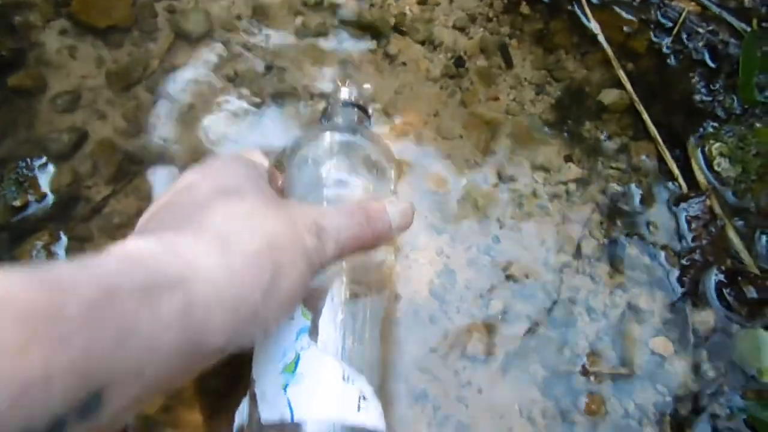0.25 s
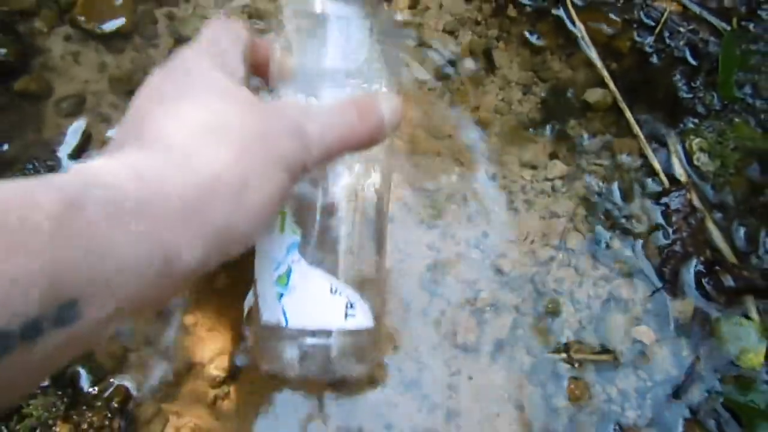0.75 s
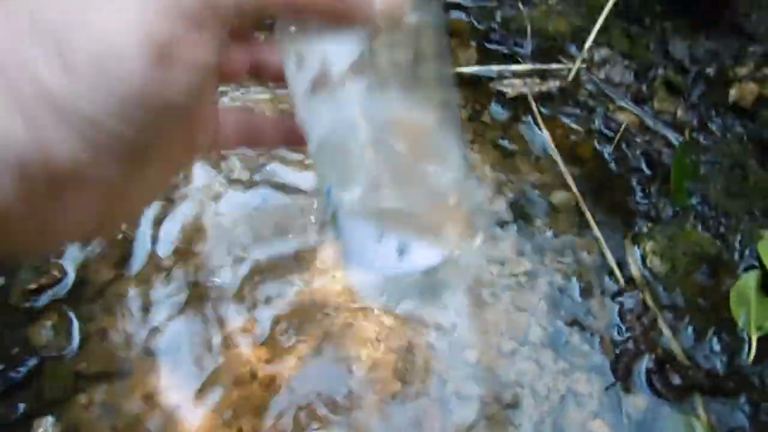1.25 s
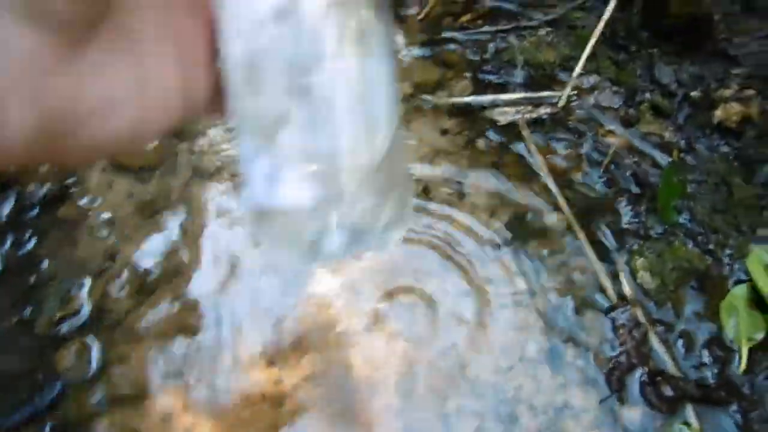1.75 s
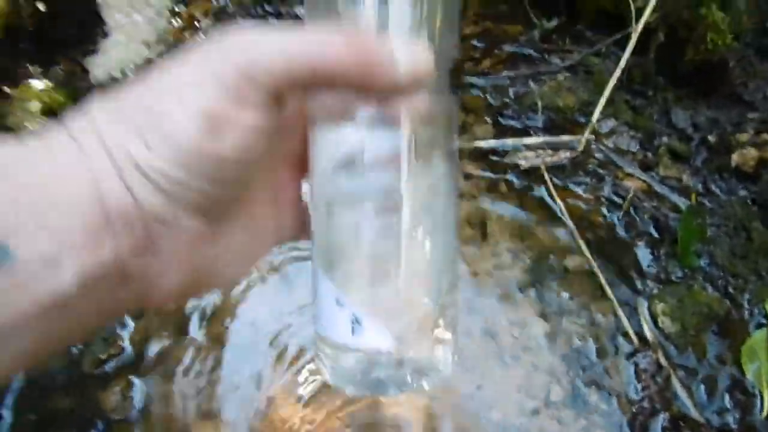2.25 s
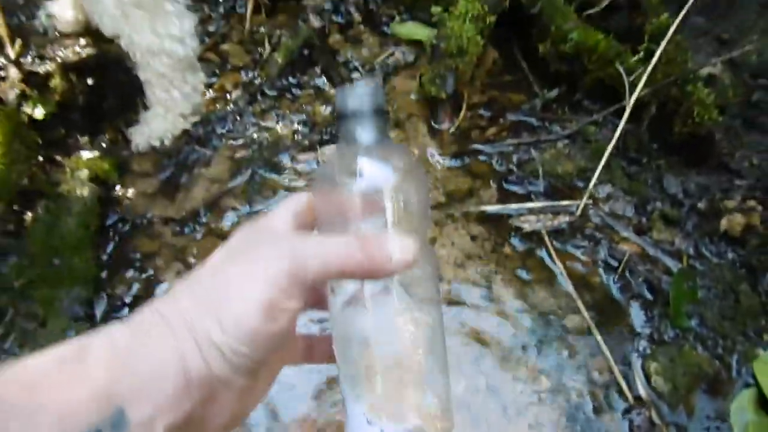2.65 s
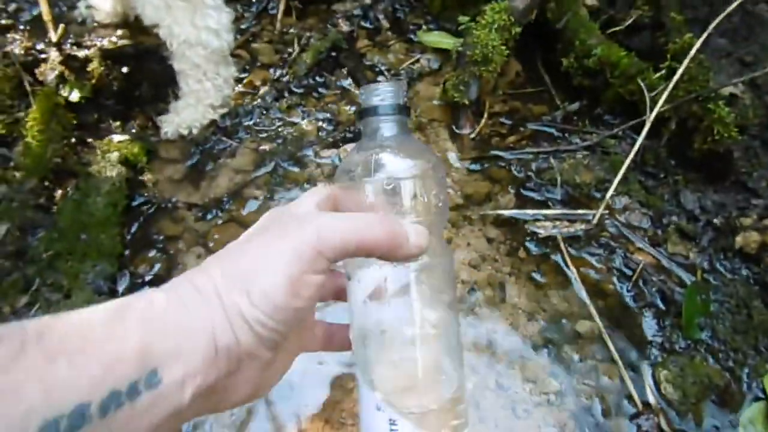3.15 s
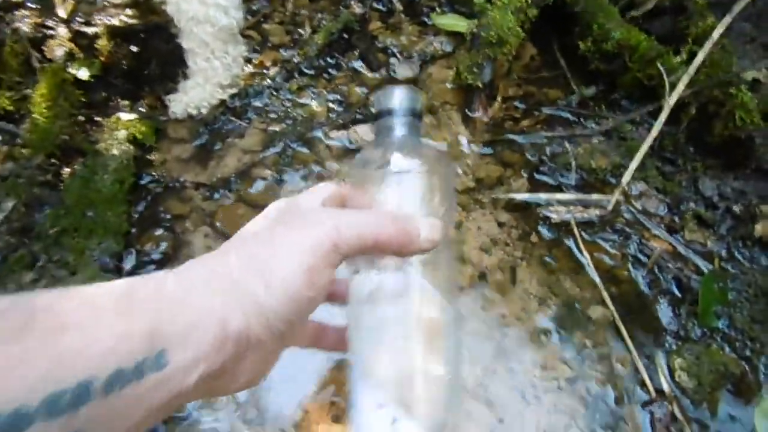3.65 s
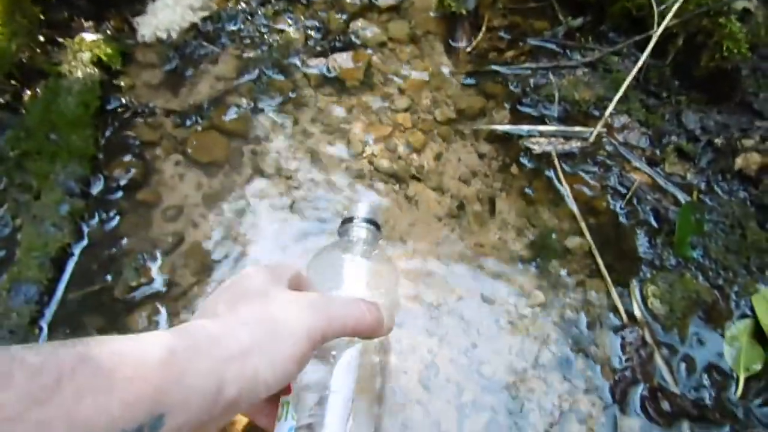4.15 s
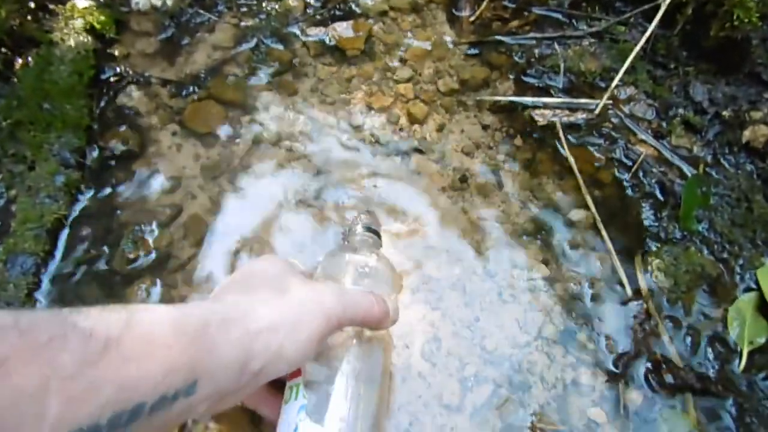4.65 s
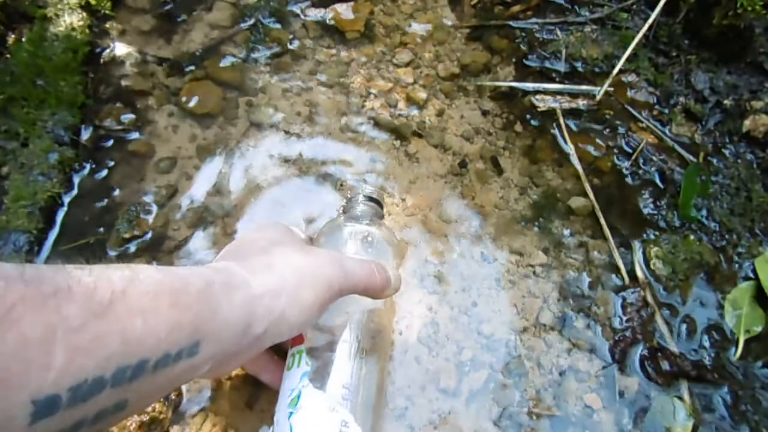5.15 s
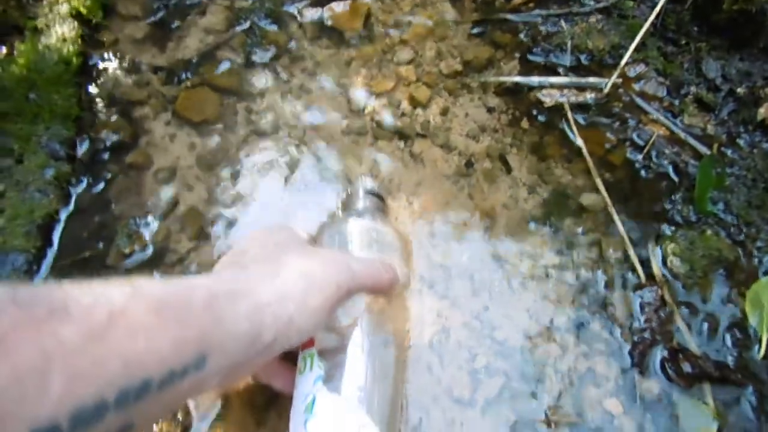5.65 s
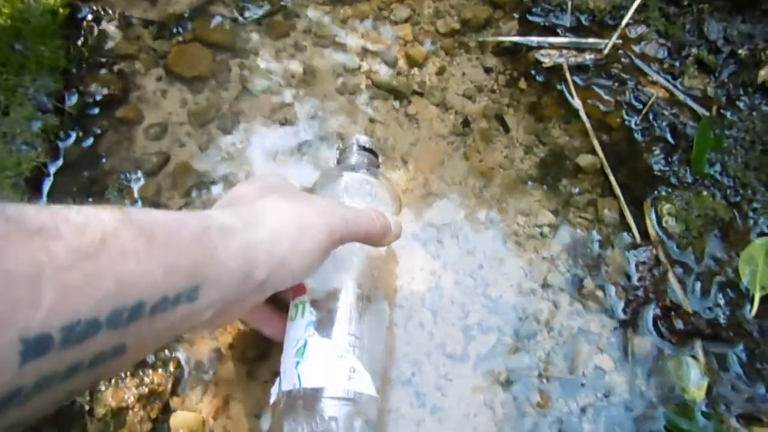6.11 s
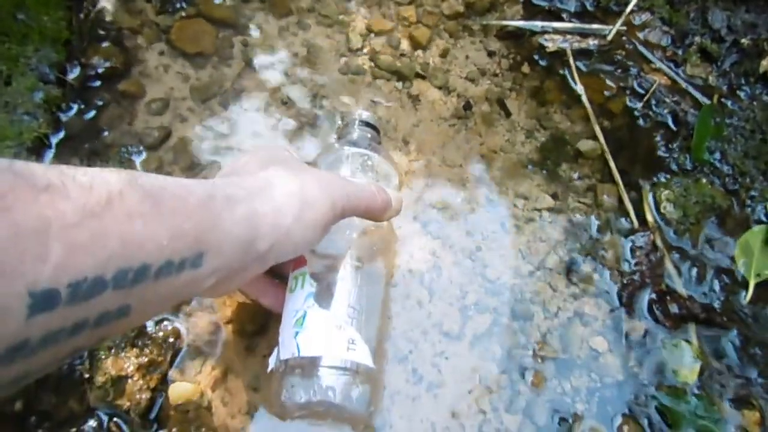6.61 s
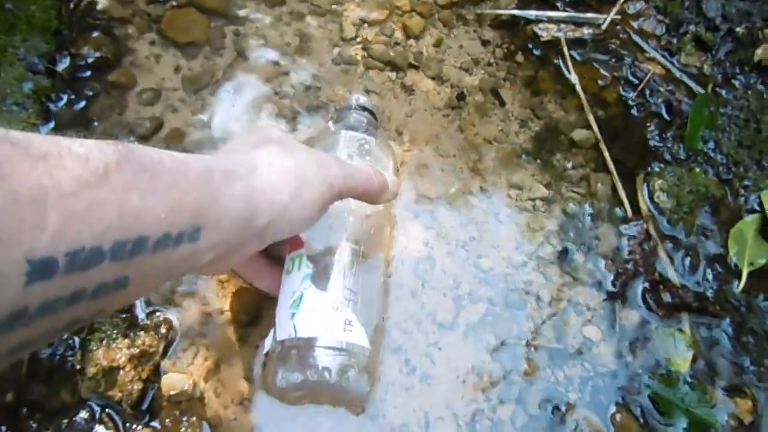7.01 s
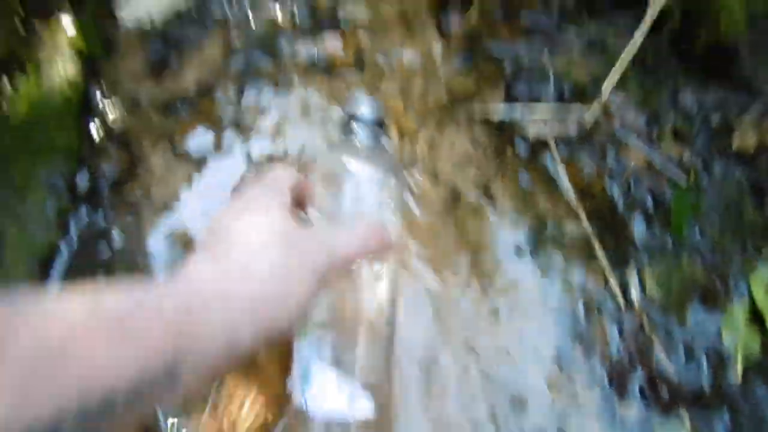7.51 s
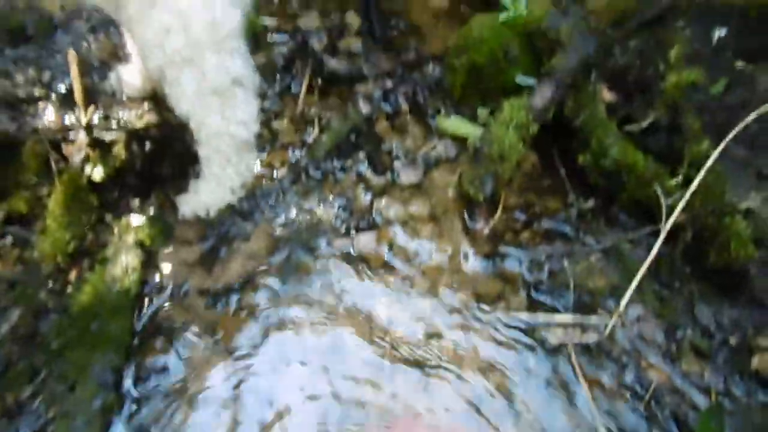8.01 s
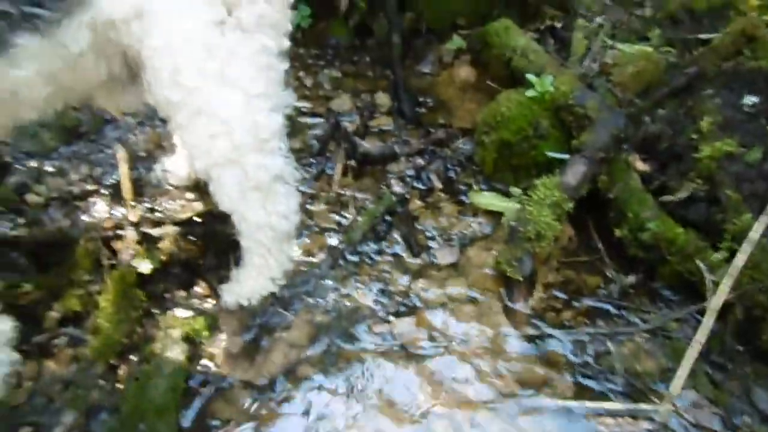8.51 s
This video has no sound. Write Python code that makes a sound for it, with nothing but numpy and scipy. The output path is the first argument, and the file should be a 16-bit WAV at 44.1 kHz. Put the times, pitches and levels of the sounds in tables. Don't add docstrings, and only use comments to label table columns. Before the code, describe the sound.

A soft, steady stream hiss lies under everything, in woodland with blurred echoes. From 0.1 to 0.85 s a plastic bottle is scraped over gravel close by: dense, sharp crackles, hollow clicks and gritty rubbing, loudest at 0.3-0.65 s, with low handling bumps. A tiny drip-like tick comes at 1 s. The bottle then nearly stops while a bird gives short whistles, quick chips and churrs around 1.9-2.5 s, a high whistle at 2.7 s and a rapid buzzing trill from 2.9 to 4 s; a lower bird answers faintly. Five sweet falling syllables run from 4.2 to 5.1 s over lighter, scattered scuffs and ticks. Thin whistles and a faint distant buzz follow until 6.9 s. Bottle scraping thickens from 6.8 to 7.6 s, with a knock at 7.5 s, then a short bubbly gulp at 7.7-7.8 s. Water hiss remains, with dull microphone thumps near 8.5 s and slightly fuller water at the end.

```python
import sys
import numpy as np
from scipy import signal
from scipy.io import wavfile
from scipy.ndimage import uniform_filter1d

SR = 44100
rng = np.random.default_rng(int(sys.argv[2]) if len(sys.argv) > 2 else 0)


def convert_level_to_amplitude(level_db):
    exponent = np.asarray(level_db, float) / 20
    return 10 ** exponent


def wav_out(sig):
    wavfile.write(sys.argv[1], SR, np.round(np.clip(np.atleast_2d(sig).T, -1, 1) * 32767).astype(np.int16))


N = 386757
REFILL_S = 3

# delay t/s, length t/s, first f/Hz, last f/Hz, level/dB, buzz depth f/Hz
BUZZY_FALL = [(0, .062, 5560, 4880, 2, 400)]


def evened(x):
    return x / np.sqrt(np.mean(x ** 2) + 1e-20)


def read(points, hz):
    f, value = np.transpose(points)
    return np.interp(np.log(hz + 1), np.log(f + 1), value)


def add(mix, s, sound):
    part = mix[round(s * SR):][:len(sound)]
    part += sound[:len(part)]


def band(x, lo_hz, hi_hz):
    return signal.sosfilt(signal.butter(2, [lo_hz, hi_hz], "bandpass", fs=SR, output="sos"), x)


def stream():
    # f/Hz, level/dB per Hz
    colour = [(12, -38.5), (20, 1), (146, -7.5), (300, -10), (3680, -14.5), (7450, -16), (8240, -29.5),
              (10700, -61)]
    # t/s, level/dB
    stir = [
        (0.0, -64.5),
        (0.539, -65.5),
        (1.05, -64),
        (6.722, -63.5),
        (7.3, -64),
        (8.77, -61),
    ]
    frames, hz = N // 256 + 5, np.fft.rfftfreq(1024, 1 / SR)
    real, imag, patches = rng.standard_normal((frames, 513, 3)).T
    patches = uniform_filter1d(patches, size=12, axis=0)
    patches_db = evened(uniform_filter1d(patches, size=12, axis=1))
    s, db = np.transpose(stir)
    swell_db = np.interp(np.arange(frames) * 256 / SR, s, db - np.median(db))
    swell_db = swell_db / (1 + (hz[:, None] / 1500) ** 2)
    spectrum = (real + 1j * imag) * convert_level_to_amplitude(read(colour, hz)[:, None] + patches_db + swell_db)
    hiss = signal.istft(spectrum, nperseg=1024, noverlap=768)[1][:N]
    return convert_level_to_amplitude(-57.5) * evened(hiss)


def ring(hz, width_hz, t):
    return np.exp(-np.pi * width_hz * t) * np.sin(2 * np.pi * hz * t)


def wall(modes):
    # f/Hz, level/dB
    grit_colour = [(250, -29.5), (550, -2.5), (1500, -8), (3800, -2), (7800, -14), (11000, -60.5)]
    t, hz = np.arange(1024) / SR, np.fft.rfftfreq(1024, 1 / SR)
    log_gain = np.log(convert_level_to_amplitude(np.maximum(read(grit_colour, hz), -60)))
    log_gain = np.r_[log_gain, log_gain[-2:0:-1]]
    tick = np.fft.ifft(np.exp(np.conj(signal.hilbert(log_gain)))).real
    plate = sum(convert_level_to_amplitude(db) * np.sqrt(width) * ring(f, width, t) for f, width, db in modes)
    return evened(tick) + 0.49 * evened(plate)


def grains(shape, per_s, spread_db):
    size_db = spread_db * np.minimum(rng.exponential(1, shape), 4)
    sizes = convert_level_to_amplitude(size_db) * rng.choice([-1., 1.], shape)
    return sizes * (rng.random(shape) < per_s / SR)


def scuff(length, db, hz, boom_db, snap_db, panel, body, grit, t):
    u = t / length - .55
    snap = 5.4 * (abs(t - .5 * length) < .5 / SR)
    swell = np.exp(-(np.where(u < 0, 3.5, 1.8) * u) ** 2)
    response = evened(body) + panel * evened(ring(hz, 140, t[:len(body)]))
    sound = signal.fftconvolve((grit + snap) * swell, response)
    parts = [band(sound, 430, 950), band(sound, 900, 4400), band(sound, 4400, 9000)]
    gains = convert_level_to_amplitude(db + np.array([boom_db, 0, snap_db])) * np.sqrt(length * SR)
    return sum(g * p / np.linalg.norm(p) for p, g in zip(parts, gains))


def cracks(empty, filled):
    # t/s, length t/s, rms level/dB, ring f/Hz
    full = [(.28, .013, -43, 2530), (.325, 0.011, -44, 2080), (.364, 0.017, -47.5, 3000),
            (.4432, 0.017, -46, 2200), (.455, 0.014, -46, 1200), (.5605, 0.004, -35.5, 2010),
            (.574, .005, -39.5, 600), (.808, 0.0079, -48, 1770), (4.351, 0.014, -53, 2000),
            (4.682, .016, -51, 760), (4.874, 0.014, -49.5, 2960), (4.916, 0.023, -53, 3000),
            (6.352, 0.022, -54.5, 2030), (6.9796, 0.0093, -50, 2150), (7.047, .02, -53.5, 1000),
            (7.2907, .024, -45, 2010), (7.49, .015, -38.5, 700), (7.478, 0.015, -58, 3120),
            (7.305, .015, -45.5, 3200), (7.492, .006, -38, 3200), (7.6825, .0084, -41.5, 885),
            (7.724, 0.0093, -53, 3420)]
    dull = [(.234, .022, -53.5, 680), (.5736, .0055, -51, 2050), (.5907, .022, -45, 1940),
            (.612, .008, -40, 500), (.6205, .004, -32, 2050), (.326, .012, -41.5, 3830),
            (.646, .006, -48, 3700), (7.432, .008, -49, 3050), (.633, .008, -39, 2700),
            (.744, .0099, -51, 1440), (1.896, .019, -53.5, 2260), (4.882, .023, -52, 3200),
            (6.301, .021, -55, 2120), (6.688, 0.0036, -46.5, 3730), (6.8297, .013, -45, 3310),
            (6.938, .004, -44, 3250), (7.028, .0056, -47.5, 3170), (7.2125, .0044, -46, 2020),
            (7.218, 0.0043, -40.5, 2120), (7.253, .019, -49, 2050), (7.31, .021, -47, 1190),
            (7.348, .016, -54.5, 1080), (7.403, .0078, -56, 3100), (7.462, .0039, -47, 3100),
            (7.544, .008, -38.5, 800)]
    crisp = [(.135, .023, -52, 2700), (.154, 0.024, -56, 2450), (.1913, 0.0087, -49, 1370),
             (.3071, 0.0084, -50, 2300), (.496, .017, -38, 2600), (.544, .006, -41, 2010),
             (.552, 0.002, -46, 1930), (.668, 0.011, -44, 2040), (.7185, 0.0058, -47, 1990),
             (.759, 0.004, -49, 1860), (.791, .022, -45.5, 3100), (4.214, 0.0054, -44.5, 2840),
             (4.279, 0.0097, -55, 1058), (4.7374, 0.0048, -49.5, 1700), (4.8494, 0.0087, -52, 1800),
             (4.857, .014, -49, 2410), (5.067, 0.005, -55, 1690), (5.079, 0.0039, -49.5, 760),
             (5.3886, 0.0041, -51.5, 1240), (5.5865, 0.0026, -39.5, 2160), (6.2255, 0.004, -48, 3220),
             (7.016, 0.016, -49.5, 2830), (7.421, 0.0083, -40.5, 2100), (7.532, 0.005, -46, 2300),
             (5.089, .004, -46.5, 4070), (5.317, .003, -57, 2250), (5.335, .003, -52, 1220),
             (5.609, .005, -53, 3900), (.097, .004, -52.5, 4500), (7.543, .008, -47, 1750),
             (7.74, .0073, -57, 3440), (7.7617, 0.004, -44.5, 2270), (7.8076, 0.0037, -53, 1160)]
    thin = [(.176, .009, -48, 2420), (.26, 0.0044, -50, 2520), (.312, .0021, -59, 2190),
            (.34, 0.004, -31, 2430), (.4155, .006, -47, 3770), (.7465, 0.0042, -48, 1800),
            (.4915, .003, -32.5, 2060), (.484, .006, -40, 2130), (7.24, .005, -48, 1990),
            (5.418, .005, -54, 2730), (5.709, .004, -51.5, 1680), (6.354, .005, -47.5, 1160),
            (6.835, .012, -49, 1160), (.5094, .0069, -39, 2020), (.684, .006, -42.5, 1870),
            (.769, .016, -58, 2570), (4.2225, 0.0077, -38, 3020), (5.2888, .0022, -48.5, 1290),
            (5.7219, .026, -53.5, 2560), (5.744, .013, -50.5, 3240), (6.317, .019, -56, 3180),
            (6.883, .004, -50, 3200), (6.893, 0.0036, -43.5, 3280), (6.925, 0.0043, -49, 3200),
            (7.269, .0034, -51, 2110), (7.278, .026, -47.5, 3300), (7.624, .004, -43, 1590)]
    ringing = [(.482, .03, -43.5, 2060), (.515, .03, -50.5, 2030), (.542, 0.022, -45, 2010),
               (.57, .035, -47.5, 1960), (.5, .04, -51, 1010), (.585, 0.022, -47, 3700),
               (.667, .025, -52, 1880), (.27, .03, -52, 2450), (.43, .03, -51, 2050),
               (4.22, .012, -47, 1750), (6.875, .03, -54, 3200), (6.985, .04, -58.5, 2070),
               (7.245, .03, -51.5, 2010), (7.29, .025, -47.5, 3970), (7.4, .04, -52, 3050),
               (7.425, .025, -54, 2010), (7.475, 0.028, -47, 3200)]
    kinds = [(full, -6.5, -2, 0.97), (dull, -8.5, -22.5, .86), (crisp, -21, 0.7, 0.97),
             (thin, -15, -15, 0.71), (ringing, -19, -20, 4)]
    out, t = np.zeros(N), np.arange(2200) / SR
    rows = [(*row, *colour) for table, *colour in kinds for row in table]
    clusters = grains((150, len(t)), 9000, 2.6)
    for (s, length, *rest), grit in zip(rows, clusters):
        body = empty if s < REFILL_S else filled
        add(out, s - .2 * length, scuff(length, *rest, body, grit, t))
    return out


def slides(empty, filled):
    # t/s, length t/s, grind level/dB
    pushes = [(0.098, 0.13, -58), (0.22, 0.047, -61), (0.254, 0.096, -49), (.35, 0.058, -61),
              (0.405, 0.077, -53.5), (0.478, 0.062, -48.5), (0.535, 0.125, -49), (0.655, 0.055, -52),
              (0.735, 0.057, -57), (0.794, 0.031, -50.5), (1.066, 0.023, -63), (1.893, 0.055, -62.5),
              (4.264, 0.041, -58), (4.346, 0.078, -59.5), (4.57, 0.081, -60), (4.633, 0.14, -62.5),
              (4.782, 0.19, -58), (5.047, 0.051, -59), (5.326, 0.0068, -70), (5.41, 0.022, -59.5),
              (5.507, 0.063, -58.5), (5.575, 0.04, -53.5), (5.678, 0.15, -62.5), (6.066, 0.018, -58),
              (6.286, 0.065, -54.5), (6.5, 0.023, -65), (6.802, 0.18, -58), (6.971, 0.089, -60.5),
              (7.203, .12, -57), (7.31, .08, -59.5), (7.39, 0.17, -57), (0.819, .05, -69),
              (5.305, 0.12, -65), (7.583, 0.22, -58.5)]
    clumps = evened(band(rng.standard_normal(N), 30, 150))
    grit = grains(N, 8000, 2.2) * convert_level_to_amplitude(3.0 * clumps)
    early = np.arange(N) < REFILL_S * SR
    grind = signal.oaconvolve(grit * early, empty) + signal.oaconvolve(grit * ~early, filled)
    grind = grind[:N]
    level = np.zeros(N)
    for s, length, db in pushes:
        add(level, s, convert_level_to_amplitude(db) * signal.windows.tukey(round(length * SR), .4))
    return level * grind / np.std(band(grind, 900, 3000))


def bumps():
    # t/s, peak level/dB, f/Hz
    knocks = [(0.294, -46, 122), (0.311, -49, 150), (0.661, -51, 248), (0.721, -55, 250), (.76, -57, 90),
              (7.5, -46, 240), (5.101, -60, 140), (6.361, -51, 170), (6.85, -52, 150), (7.219, -57, 170),
              (8.43, -54, 44.8), (8.486, -45, 50), (8.508, -51, 70), (8.544, -48, 60), (8.561, -48, 80),
              (8.588, -49, 59), (8.611, -53, 70)]
    out, t = np.zeros(N), np.arange(8000) / SR
    for s, db, hz in knocks:
        u = t * hz - .6
        add(out, s - .6 / hz, convert_level_to_amplitude(db) * np.cos(2 * np.pi * u - .7) * np.exp(-(u / .6) ** 2))
    return out


def bubbles():
    # t/s, peak level/dB, f/Hz, rise per s, 60 dB decay t/s
    pops = [(7.684, -42.5, 247, 0.42, 0.21), (7.689, -36, 879, 0.45, 0.071), (7.702, -41, 1630, 1, 0.053),
            (7.73, -40.5, 3450, 0.71, 0.049), (7.771, -45, 620, 3.2, 0.068), (7.803, -39.5, 1150, 4, 0.03),
            (7.812, -51, 1330, 1.5, 0.14), (7.058, -48, 600, 1, 0.026), (1, -53.5, 1100, 1.1, 0.13),
            (4.7, -43, 8300, 1, 0.0055), (6.2, -28.5, 4800, 1, 0.0023), (6.655, -40, 4100, 0.91, 0.008),
            (.978, -37, 3940, 1, 0.0057), (1, -47.5, 7350, 1, 0.016), (4.4, -46, 5700, 1, .02),
            (5.21, -49, 7000, 1, .02), (5.37, -49, 5700, 1, .015), (7.5, -48, 5000, 1, .015),
            (6.7, -45.5, 4300, 1, .02), (7.74, -44, 4900, 1, .02), (6.6, -51.5, 520, 1, .1),
            (7.305, -47, 1100, 1, 0.15)]
    out, t = np.zeros(N), np.arange(8000) / SR
    for s, db, hz, rise, t60 in pops:
        add(out, s, convert_level_to_amplitude(db - 60 * t / t60) * np.sin(2 * np.pi * hz * (t + rise * t ** 2)))
    return out


def note(length, first_hz, last_hz, db, buzz_hz=None):
    t = np.arange(0, length, 1 / SR)
    warble_hz = buzz_hz or min(25 + 0.018 * abs(last_hz - first_hz) / length, 203)
    hz = first_hz + (last_hz - first_hz) * t / length + warble_hz * np.sin(2 * np.pi * 178 * t)
    tone = np.sin(2 * np.pi * np.cumsum(hz) / SR)
    return np.sqrt(2) * convert_level_to_amplitude(db) * tone * signal.windows.tukey(len(t), .45)


def phrase(rows):
    out = np.zeros(N)
    for s, *shape in rows:
        add(out, s, note(*shape))
    return out


def syllables(starts, parts):
    out = np.zeros(N)
    for (s, db), sharp in zip(starts, rng.normal(1, .008, 40)):
        for after, length, first_hz, last_hz, *rest in parts:
            add(out, s + after, convert_level_to_amplitude(db) * note(length, sharp * first_hz, sharp * last_hz, *rest))
    return out


def trill(rows, per_s, slack_s):
    s, db = np.transpose(rows)
    starts = np.arange(s[0], s[-1] - .04, 1 / per_s)
    early, loud_db = rng.standard_normal((40, 2))[:len(starts)].T
    return np.transpose([starts + slack_s * early, np.interp(starts + .03, s, db) + loud_db])


def near_bird():
    # t/s, length t/s, first f/Hz, last f/Hz, level/dB
    whistles = [(0.989, 0.03, 8060, 6440, -57.5), (1.071, 0.044, 5750, 6520, -54.5),
                (1.475, 0.03, 5210, 4860, -55.5), (1.503, 0.027, 4870, 4200, -60),
                (1.595, 0.068, 6160, 6490, -56.5), (1.665, 0.058, 5860, 5750, -65),
                (2.703, 0.039, 6440, 7060, -51.5), (2.72, .12, 7250, 6960, -48),
                (3.986, 0.031, 8260, 6860, -48), (4.008, 0.046, 6950, 7050, -55),
                (4.073, .05, 3680, 3960, -56), (4.107, 0.09, 3910, 4003, -51.5),
                (5.223, 0.16, 4270, 4134, -49.5), (5.42, 0.1, 7950, 8050, -66),
                (5.582, 0.067, 7800, 7570, -62), (5.663, 0.074, 5964, 5775, -48.5),
                (5.694, 0.059, 5650, 4840, -50), (7, 0.034, 8020, 6770, -52),
                (7.045, 0.045, 4450, 4100, -55), (7.081, 0.16, 4160, 4020, -53.5),
                (7.221, 0.13, 4100, 3980, -57), (7.386, 0.22, 3980, 3930, -59),
                (7.564, 0.094, 3850, 3910, -62), (7.69, 0.06, 6500, 6800, -49),
                (7.748, .14, 6790, 7650, -53.5), (7.85, 0.048, 7500, 7470, -62)]
    # (delay t/s, length t/s, first f/Hz, last f/Hz, level/dB)
    chips = [(1.875, 7), (2.085, 9.5), (2.298, 10), (2.508, 10)], [(0, 0.017, 6400, 8600, -65)]
    churrs = [(1.94, -0.55), (2.15, -0.41), (2.365, 0.97)], [(0, 0.011, 5900, 5980, -50),
              (.015, 0.0078, 5910, 4500, -50), (.022, .02, 4440, 4700, -52.5),
              (.045, 0.028, 4980, 5480, -54.5)]
    sweets = ([(4.2, 0.011), (4.405, 0.0042), (4.605, 0), (4.805, 0.0037), (5.012, 0.0076)],
              [(0, 0.034, 4910, 5240, -48.5), (.015, 0.019, 5180, 6210, -47.5),
              (.035, 0.033, 6220, 6690, -49), (.06, 0.06, 6600, 6660, -53),
              (.115, 0.048, 5085, 3550, -53.5)])
    # t/s, level/dB
    contour = [
        (2.924, -51),
        (3.05, -51),
        (3.14, -50.5),
        (3.6, -48),
        (3.97, -49.5),
    ]
    out = phrase(whistles) + syllables(trill(contour, 14.0, 0.0015), BUZZY_FALL)
    for starts, parts in (chips, churrs, sweets):
        out += syllables(starts, parts)
    return out


def answering_bird():
    # t/s, length t/s, first f/Hz, last f/Hz, level/dB
    answer = [(2.572, .1, 3990, 3950, -54), (2.7, .1, 3900, 3750, -66), (3.2, .08, 3150, 3050, -66),
              (2.659, 0.08, 1780, 1650, -65.5), (2.717, .044, 3600, 3400, -65),
              (2.799, 0.043, 3960, 3520, -64), (2.873, .05, 3560, 3380, -60), (2.93, .07, 3380, 3450, -60),
              (2.885, 0.076, 3900, 3660, -63), (3.07, .06, 3250, 3120, -62), (3.161, .12, 3240, 3040, -68),
              (8.332, .1, 1720, 1700, -75), (8.46, .14, 1700, 1720, -76), (8.62, .09, 1670, 1668, -75),
              (8.36, 0.3, 482, 470, -69.5), (8.37, 0.055, 340, 328, -60)]
    return phrase(answer)


def far_bird():
    # t/s, level/dB
    far_buzz = [
        (5.8, -95),
        (5.866, -64.5),
        (6.9, -67.5),
    ]
    return syllables(trill(far_buzz, 21.0, 0.01), BUZZY_FALL)


def woods(x, cluster_s, far_t60, far_db):
    t = np.arange(SR * 3 // 4) / SR
    decay = np.exp(-(t / cluster_s) ** 2) + convert_level_to_amplitude(far_db - 60 * t / far_t60)
    echoes = grains((3, len(t)), 4000, 1.0) * decay
    turn = np.pi * 4.1 * np.arange(N) / SR + np.pi / 3 * np.arange(3)[:, None]
    paths = x * np.cos(turn) * np.sqrt(2 / 3)
    return signal.fftconvolve(paths, echoes / np.linalg.norm(echoes[0]), axes=1).sum(0)[:N]


def scene():
    # f/Hz, width f/Hz, level/dB
    empty_modes = [(600, 130, -5.5), (1037, 58, -6), (1960, 190, -0.5), (2520, 130, -4), (3100, 240, -5.5),
                   (3850, 310, -1), (4670, 340, -9), (5670, 200, -13.5), (6650, 190, -7)]
    # f/Hz, width f/Hz, level/dB
    filled_modes = [(650, 260, -3), (1177, 89, -5), (1530, 120, -9.5), (2010, 100, -2), (3200, 88, -3),
                    (3970, 160, -1), (5440, 120, -8.5), (6600, 200, -6.5)]
    bodies = wall(empty_modes), wall(filled_modes)
    bottle = cracks(*bodies) + slides(*bodies) + bumps() + bubbles()
    bottle = bottle + convert_level_to_amplitude(-13) * woods(bottle, .015, 0.25, -12.5)
    song = near_bird() + answering_bird() + far_bird()
    song = convert_level_to_amplitude(-10.0) * song + woods(song, 0.072, 1.0, -7)
    return (bottle + song + stream())[None]


def band_limit(x):
    return signal.sosfilt(signal.butter(12, 8390, fs=SR, output="sos"), x)


def record(dry):
    edges_hz, gains = [0, 7700, 8100, 8500, SR / 2], [1, 1, .45, 0, 0]
    taps = signal.firwin2(801, edges_hz, gains, window=("kaiser", 9), fs=SR)
    return band_limit(signal.oaconvolve(dry, taps[None], "same"))


dry = scene()
out = record(dry)
wav_out(out)
```